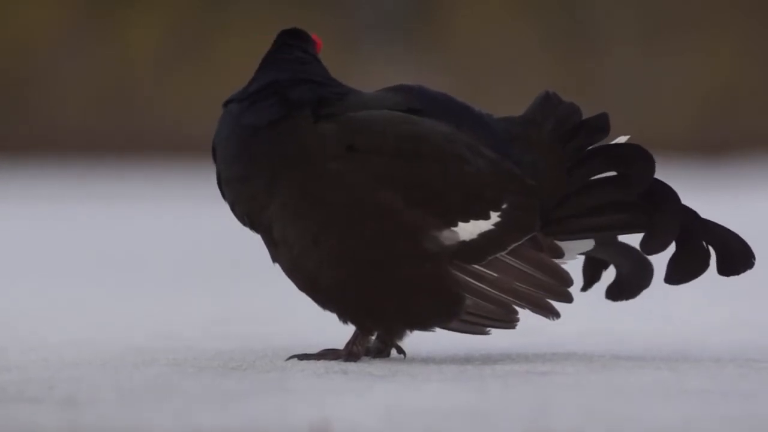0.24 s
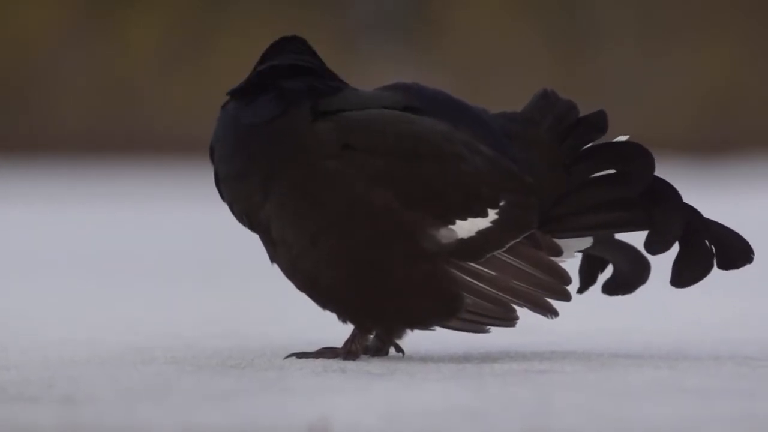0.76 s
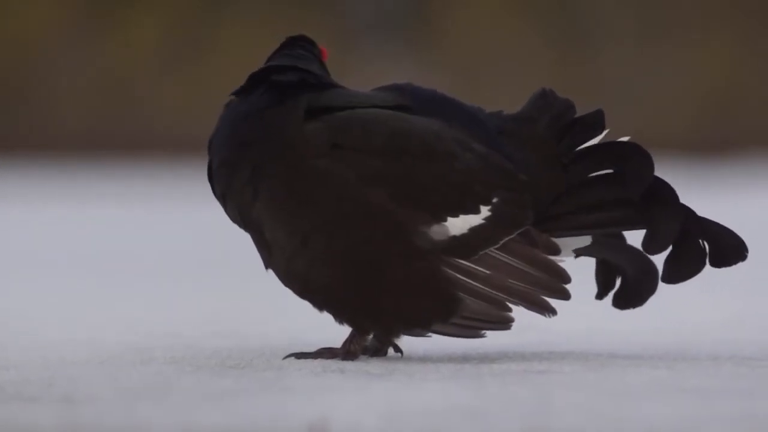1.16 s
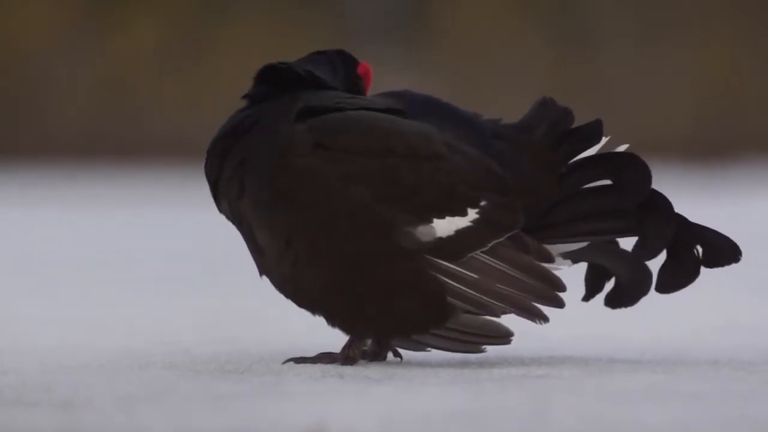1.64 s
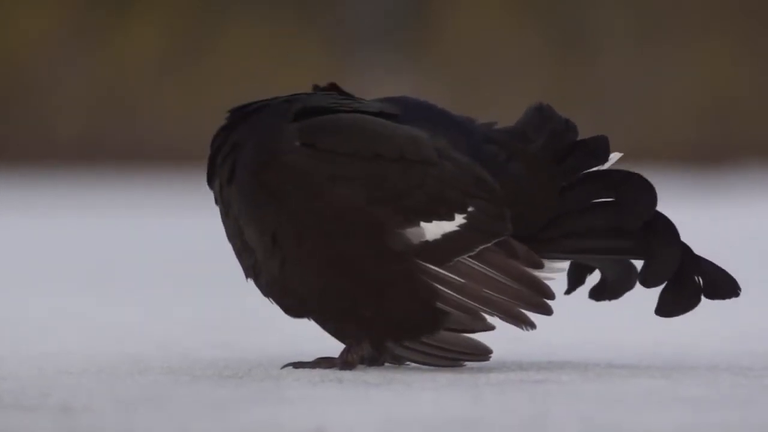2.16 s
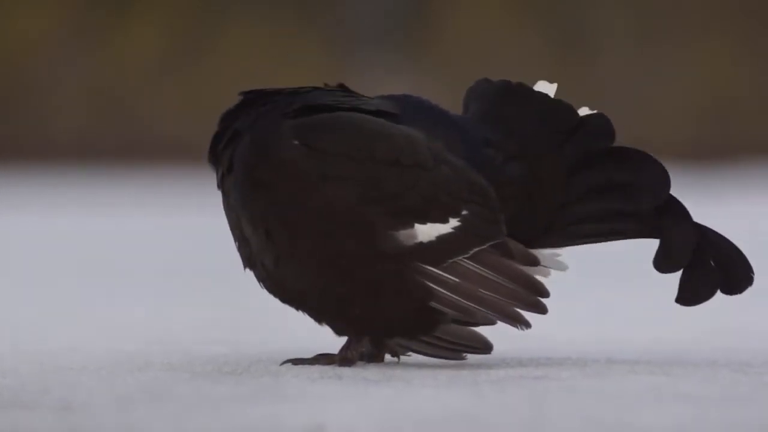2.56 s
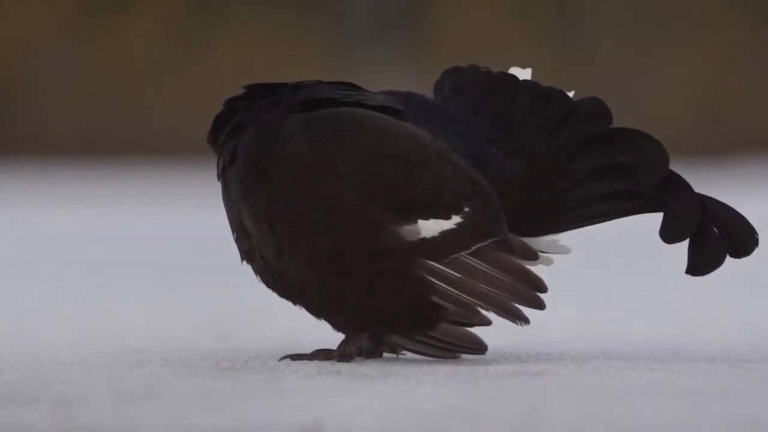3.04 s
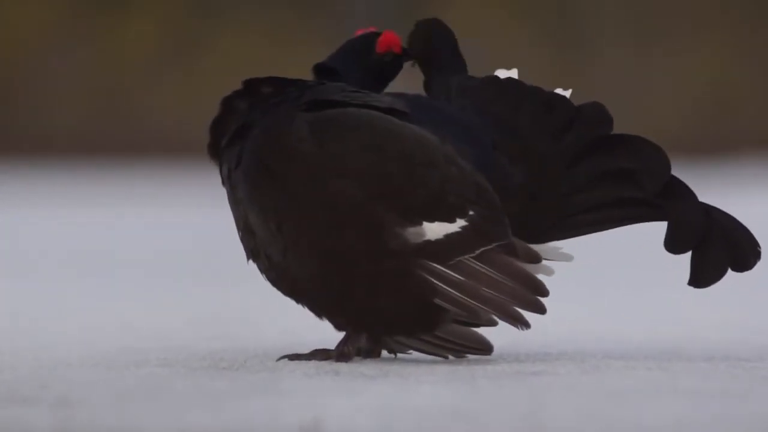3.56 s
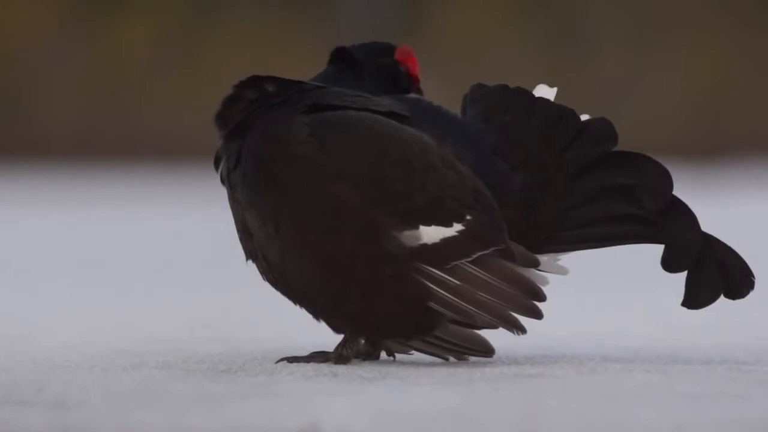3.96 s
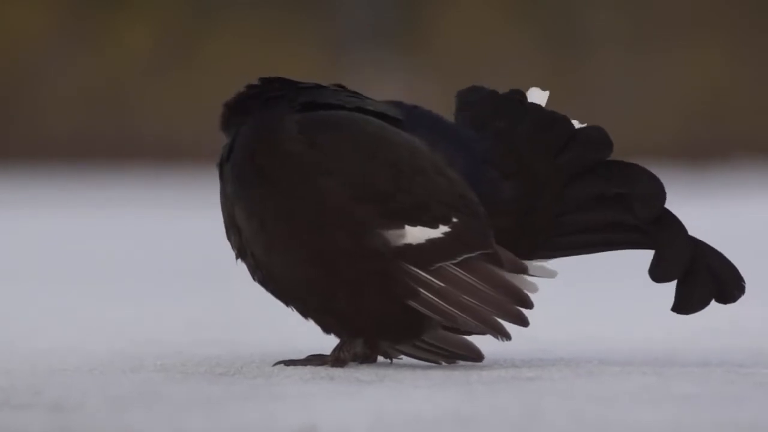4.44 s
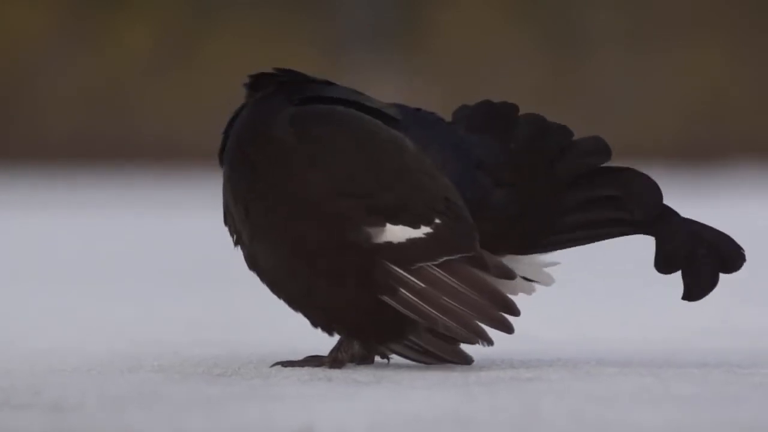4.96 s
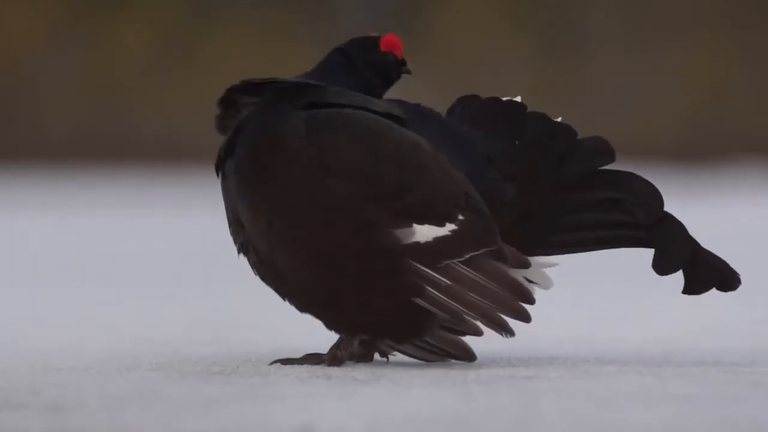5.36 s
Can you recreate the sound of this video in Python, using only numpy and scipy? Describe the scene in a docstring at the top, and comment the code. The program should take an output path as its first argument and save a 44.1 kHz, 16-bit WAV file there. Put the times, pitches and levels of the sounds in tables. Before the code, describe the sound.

Outdoors on frozen ground, a stereo microphone picks up low hollow grouse coos, mostly left. Rippling phrases give way to an even roll, four fuller coos, a short pause and another ripple, then sparse weak bubbling. Two rough hisses, distant blurred cooing, thin chirps and slight wind puffs accompany them over quiet hiss.

```python
"""Black grouse cocks display on open frozen ground, left of a stereo microphone: overlapping singings of one
bubbling song, made of gliding sines through an air-sac band, over a faint blur of distant cocks.
Two sneezing hisses are noise through a moving throat resonance; a small bird far off to the right chirps in
gliding sines; shaped noise makes two puffs of wind and a hiss of air and electronics that slowly sinks."""
import sys
import numpy as np
from scipy import signal
from scipy.fft import rfft, irfft, next_fast_len
from scipy.io import wavfile
from scipy.ndimage import map_coordinates

SR = 44100
rng = np.random.default_rng(int(sys.argv[2]) if len(sys.argv) > 2 else 0)


def log_audio(samples):
    """Write samples as a 16-bit WAV file to the path given in sys.argv[1]."""
    # one column per channel
    frames = np.atleast_2d(samples).T
    # limit to full scale, then quantise
    limited = np.clip(frames, -1, 1)
    pcm = np.round(limited * 32767).astype(np.int16)
    wavfile.write(sys.argv[1], SR, pcm)


N = 247401  # length in samples


def amp(db):
    """Gain of a level in dB."""
    return 10 ** (np.asarray(db) / 20)


def unit(x):
    """x at rms 1."""
    return x / np.sqrt(np.mean(x ** 2) + 1e-20)


def along(points, hz):
    """Values at hz, read from (Hz, value) points on a log frequency axis."""
    point_hz, value = np.transpose(points)
    return np.interp(np.log(hz + 1), np.log(point_hz + 1), value)


def wobble(rate):
    """A smooth random curve, rate knots a second."""
    knots = rng.standard_normal(int(N * rate / SR) + 4)
    return map_coordinates(knots, [np.arange(N) * rate / SR])


def filtered(x, response):
    """x times a complex response of frequency."""
    size = next_fast_len(N + SR // 2)
    spectrum = rfft(x, size) * response(np.fft.rfftfreq(size, 1 / SR))
    return irfft(spectrum, size)[..., :N]


def placed(x, left_db, lag_s):
    """A source left_db louder and lag_s later in the left channel, shared evenly between both."""
    side = np.array([[.5], [-.5]])
    return filtered(x, lambda hz: amp(left_db * side) * np.exp(-2j * np.pi * hz * lag_s * side))


def notes(rows, edge_s, fullness):
    """Gliding sines: the pitch is a parabola through three points, the swell a skewed arch with soft edges."""
    out = np.zeros(N + 2 * SR)  # a spare second at each end for notes that cross it
    start_turns = rng.random(len(rows))
    for (start_s, length_s, start_hz, mid_hz, end_hz, peak_db, peak_place), turn in zip(rows, start_turns):
        u = np.linspace(0, 1, max(round(length_s * SR), 8))
        hz = start_hz * (1 - u) * (1 - 2 * u) + 4 * mid_hz * u * (1 - u) + end_hz * u * (2 * u - 1)
        # warping time moves the top of the arch to peak_place
        skew = np.log(.5) / np.log(np.clip(peak_place, .05, .95))
        arch = np.abs(np.sin(np.pi * u ** skew)) ** fullness
        edge = np.sin(np.pi / 2 * np.clip(np.minimum(u, 1 - u) * length_s / edge_s, 0, 1)) ** 2
        tone = np.sin(2 * np.pi * (np.cumsum(hz) / SR + turn))
        out[SR + round(start_s * SR):][:len(u)] += amp(peak_db) * arch * edge * tone
    return out[SR:SR + N]


def echo(x, t60):
    """The scattered answer of the ground and the far trees: decaying noise, different in each channel."""
    t = np.arange(SR // 2) / SR
    tail = rng.standard_normal((2, len(t))) * amp(-60 * t / t60)
    tail *= 1 - np.exp(-t / 0.0084)  # the scatter builds up before it decays
    return signal.fftconvolve(x[None], tail / np.linalg.norm(tail[0]), axes=1)[:, :N]


def rolls():
    """Even bubbles, each sliding down; pitch and level move steadily through a roll."""
    # rolls, one a row: first_bubble_s, last_bubble_s, first_hz, last_hz (middle pitch), first_peak_db, last_peak_db
    roll_rows = [(1.625, 2.544, 389, 472, -44.5, -37), (4.491, 4.779, 356, 406, -51.5, -44),
                 (5.093, 5.239, 380, 360, -48.5, -48), (5.359, 5.428, 350, 342, -58, -60.5)]
    bubble_every_s, bubble_s, onset_hz, end_hz = .0712, .042, 461, 339.3  # spacing is rounded to fit the roll
    # a low bubble lasts longer and peaks earlier
    slack_hz, slack_s_per_hz, peak_hz, peak_per_hz = 429, 0.00038, 359, 0.005
    bubbles = []
    for first_s, last_s, first_hz, last_hz, first_db, last_db in roll_rows:
        for u in np.linspace(0, 1, round((last_s - first_s) / bubble_every_s) + 1):
            start_s = first_s + u * (last_s - first_s)
            hz = first_hz + u * (last_hz - first_hz)
            length_s = bubble_s + slack_s_per_hz * max(slack_hz - hz, 0)
            peak_db = first_db + u * (last_db - first_db)
            peak_place = peak_per_hz * (hz - peak_hz)
            bubbles.append((start_s, length_s, onset_hz, hz, min(end_hz, 0.96 * hz), peak_db, peak_place))
    return bubbles


def sung(part, times):
    """The coos of one part of the song, each time it is sung."""
    rows = []
    for part_start_s, stretch, ratio, gain_db, until_s in times:
        for s, length_s, start_hz, mid_hz, end_hz, peak_db, peak_place in part:
            if s < until_s:
                rows.append((part_start_s + stretch * s, stretch * length_s, ratio * start_hz,
                             ratio * mid_hz, ratio * end_hz, peak_db + gain_db, peak_place))
    return rows


def cocks():
    """The near cocks coo through their swollen air sacs, all from one side; the sac passes one band."""
    # Every cock sings the same song: a roll of even bubbles, a climax of four full coos, a pause, a rippling close.
    # coos, almost pure, before stretch, ratio and gain: start_s (from the start of the part), length_s,
    # start_hz, mid_hz, end_hz, peak_db, peak_place (0-1)
    climax = [(.02, .048, 490, 486, 380, -36, 0.5), (.089, 0.064, 540, 522, 405, -35, 0.76),
              (.158, .062, 600, 544, 400, -37.5, 0.77), (.242, .037, 583, 528, 390, -37.5, 0.7)]
    close = [(0, 0.063, 472, 536, 532, -45.5, 0.26), (.04, 0.052, 526, 509, 414, -37, 0.74),
             (.152, 0.047, 657, 518, 460, -36.5, 0.64), (.225, 0.047, 484, 510, 560, -48, 0.44),
             (.262, 0.035, 415, 439, 483, -41, 0.51), (.268, 0.067, 438, 575, 470, -48.5, 0.26),
             (.307, 0.039, 550, 462, 397, -39.5, 0.56), (.352, .028, 392, 438, 500, -44, .5),
             (.36, 0.059, 445, 555, 480, -51, .45), (.387, 0.029, 513, 456, 407, -38, 0.54),
             (.432, 0.031, 393, 440, 503, -44, 0.36), (.442, .055, 459, 562, 447, -48.5, 0.5),
             (.49, 0.092, 501, 533, 516, -50.5, 0.35), (.563, 0.051, 537, 472, 407, -37, 0.63),
             (.644, 0.038, 484, 531, 447, -51, 0.35), (.69, 0.032, 566, 495, 440, -37, 0.65),
             (.718, 0.027, 432, 473, 510, -34, 0.42), (.742, 0.028, 540, 484, 420, -38, 0.52),
             (.77, 0.022, 526, 476.5, 572, -36.5, .64), (.808, 0.037, 632, 490, 430.5, -40, .6),
             (.832, 0.022, 493, 457, 400, -49, .4), (.88, 0.028, 572, 539.6, 420, -33, 0.36),
             (.952, 0.056, 434, 590, 520, -35, 0.46), (.996, .036, 542, 481, 400, -36.5, 0.49),
             (1.036, .022, 400, 446, 520, -38.5, 0.47), (1.051, 0.049, 524, 530, 407, -42.5, .65),
             (1.094, 0.02, 476, 523, 588, -45, 0.54), (1.105, 0.064, 701, 520, 422, -37, 0.75),
             (1.338, .031, 535, 520.5, 287, -37, .43)]
    # when a part is sung: start_s, stretch in time, pitch ratio, gain_db, until_s (part broken off, before stretch)
    climax_times = [(-.252, 1.001, 0.98, 1.8, .3), (2.599, 1.001, 1.001, 0.3, .3)]
    close_times = [(.066, 1.005, 1.04, -3.5, 1.2), (.228, 1.01, 1, 0.97, 1.5),
                   (3.096, 1.0001, 1.001, 0.6, 1.5)]
    # single coos of further cocks: start_s, length_s, start_hz, mid_hz, end_hz, peak_db, peak_place (0-1)
    strays = [(1.394, .065, 429, 583.5, 300, -41.5, 0.6), (1.449, 0.068, 413, 594, 300, -47, 0.47),
              (1.517, 0.057, 567, 516, 298, -49, .41), (1.578, 0.063, 557, 480, 372, -46.5, 0.46),
              (1.775, 0.031, 520, 470, 400, -46.5, .3), (1.845, 0.02, 499, 466, 400, -46, .4),
              (1.98, 0.031, 546, 481, 423, -45.5, 0.7), (2.229, 0.034, 566, 493, 378, -41, 0.68),
              (3.498, 0.038, 519.8, 584, 540.5, -47.5, 0.77), (3.674, .06, 561.1, 588, 440, -53, 0.52),
              (5.032, 0.052, 508, 387, 375, -42.5, 0.045), (5.522, 0.068, 444, 394, 447, -50.5, .3),
              (5.588, .021, 503, 426, 380, -42, .06)]
    # faint short high notes among the coos, each falling a little: start_s, length_s, mid_hz, peak_db
    high_rows = [(3.49, 0.072, 1085, -65.5), (3.689, 0.059, 1100, -61.5), (3.741, 0.067, 1095, -63),
                 (3.799, .04, 1070, -60), (3.865, 0.035, 1511, -58.5), (4.499, 0.063, 702, -63.5)]

    def sac(hz):
        return 1 / (1 + 1j * (hz / 470 - 470 / (hz + 1)) ** 3 * 2.5)  # one band around 470 Hz

    bubbling = notes(rolls() + sung(close, close_times) + strays, edge_s=0.0074, fullness=0.98)
    full_coos = notes(sung(climax, climax_times), edge_s=0.0063, fullness=0.43)
    voice = filtered(bubbling + full_coos, sac)
    near, wide = echo(voice, t60=0.095)
    falling = [(s, length_s, 1.015 * hz, hz, 0.924 * hz, db, .5) for s, length_s, hz, db in high_rows]
    high = notes(falling, edge_s=0.0033, fullness=0.59)
    direct = placed(voice + high + amp(-13.5) * near, left_db=6.0, lag_s=7e-5)
    return direct + amp(-25.5) * placed(wide, left_db=-10.0, lag_s=0)


def far_cocks():
    """Distant cocks blur into a faint bubbling: many short falling coos at random moments."""
    far_level = [(0, -59.5), (2.3, -60.5), (2.85, -68.5), (3.6, -57.5), (4.25, -69)]  # lowest peak level of the distant coos: time_s, level_db
    when, pitch, size = rng.random((200, 3)).T
    start_s = when * N / SR
    hz = 350 + 190 * pitch
    peak_db = np.interp(start_s, *np.transpose(far_level)) + 6 * size
    length_s, peak_place = np.full(200, 0.0469), np.full(200, .5)
    rows = np.transpose([start_s, length_s, hz + 50, hz, hz - 50, peak_db, peak_place])
    return placed(notes(rows, edge_s=0.0078, fullness=1.0), left_db=1.5, lag_s=0)


def air():
    """Smooth wide noise of air and electronics, drifting and sinking a little; the spaced ports hear it partly alike."""
    air_spectrum = [(15, -64), (60, -24.5), (130, -16), (290, -4), (900, -3), (2100, -7.5), (6000, -14),
                    (14400, -18.5)]  # colour of the hiss: pitch_hz, level_db (per Hz, relative)
    likeness = [(200, 0.57), (620, -0.42), (1350, -0.5), (2930, -0.23), (6370, 0.24)]  # how alike left and right are: pitch_hz, correlation (-1 to 1)

    def colour(hz):
        # the angle sets how much is common to both channels and how much opposed
        angle = np.arccos(np.clip(along(likeness, hz), -1, 1)) / 2
        return amp(along(air_spectrum, hz)) * [np.cos(angle), np.sin(angle)]

    mid, side = filtered(rng.standard_normal((2, N)), colour)
    # starts near -57 dB and sinks 0.13 dB a second
    level_db = -57 + 0.43 * wobble(6.4) - 0.13 * np.arange(N) / SR
    return amp(level_db) * unit(np.array([mid + side, mid - side]))


def small_bird():
    """Thin chirps of one shape, a dip, a shelf, a last rise, and a short falling note: gliding sines."""
    # far chirps: start_s, length_s, shelf_hz, top_hz (of the last rise), level_db (before the shape's own)
    chirps = [(0.468, 0.052, 4710, 5370, -62.5), (0.769, 0.056, 4480, 5350, -62),
              (1.072, 0.05, 4220, 5000, -63), (2.414, .054, 4900, 6180, -67.5),
              (2.559, .047, 4430, 5400, -67), (2.671, 0.051, 4530, 5880, -62)]
    # shape of one chirp: share of the length, pitch step (dip -1, shelf 0, top 1), level_db (relative)
    chirp_shape = [(0, .6, -8), (.22, -1.1, -7.5), (.5, -0.073, -6), (.72, -.05, -1), (1.001, 1, -1)]
    # short falling note: start_s, length_s, start_hz, mid_hz, end_hz, peak_db, peak_place (0-1)
    cheeps = [(2.828, .02, 4800, 4300, 3850, -66, .6)]
    out = np.zeros(N)
    share, rise, shape_db = np.transpose(chirp_shape)
    for start_s, length_s, shelf_hz, top_hz, db in chirps:
        u = np.linspace(0, 1, round(length_s * SR))
        step = np.interp(u, share, rise)
        hz = shelf_hz + step * np.where(step > 0, top_hz - shelf_hz, 800)  # a dip step is 800 Hz
        tone = np.sin(2 * np.pi * np.cumsum(hz) / SR)
        out[round(start_s * SR):][:len(u)] = amp(db + np.interp(u, share, shape_db)) * tone
    out = out + notes(cheeps, edge_s=.004, fullness=0.67)
    return placed(out, left_db=-17.0, lag_s=0) + echo(out, t60=0.13)


def hisses():
    """Turbulent air rings a narrow throat resonance that sinks and rises, inside a broad weak one; the flow flutters."""
    # air through the open bill, one list a hiss: time_s, resonance_hz (throat), flow_db (before flutter and ring level)
    hiss_curves = [
        [(1.02, 1750, -66), (1.06, 1525, -57), (1.13, 1325, -57.5), (1.21, 1227, -62), (1.26, 1200, -70.5),
         (1.31, 1234, -60), (1.39, 1272, -65), (1.43, 1347, -53), (1.49, 1379, -63), (1.54, 1423, -58),
         (1.62, 1516, -61.5), (1.78, 1656, -70)],
        [(4.24, 1600, -66.5), (4.27, 1450, -58.5), (4.34, 1317, -52), (4.43, 1198, -71), (4.52, 1132, -69),
         (4.63, 1375, -65), (4.72, 1493, -65.5), (4.78, 1710, -74)],
    ]
    t, out = np.arange(N) / SR, np.zeros(N)
    for rows in hiss_curves:
        time_s, throat_hz, flow_db = np.transpose(rows)
        turns = np.cumsum(np.interp(t, time_s, throat_hz)) / SR
        flow = amp(np.interp(t, time_s, flow_db, -120, -120) + 2.75 * wobble(29.97))
        # the narrow ring gives way to the broad one as the bill opens
        sharp_db = np.interp(t, time_s[[0, -1]], [0, -11])
        broad_db = -13.5 - 0.65 * sharp_db
        for ratio, width_hz, ring_db in ((1, 135, sharp_db), (1.13, 410, broad_db)):
            noise = rng.standard_normal(N) + 1j * rng.standard_normal(N)
            pole = [1, -np.exp(-np.pi * width_hz / SR)]  # used twice for steeper skirts
            band = signal.lfilter([1], np.convolve(pole, pole), noise)
            # the low band of noise is shifted up to the moving resonance
            ring = unit((band * np.exp(2j * np.pi * ratio * turns)).real)
            out += flow * amp(ring_db) * ring
    return placed(out, left_db=18.0, lag_s=0) + amp(-10.5) * echo(out, t60=0.72)


def puffs():
    """Wind strikes each microphone port with its own low noise, in lumps that both ports share."""
    puff_rows = [(3.981, 0.13, -56.5), (4.44, 0.054, -63.5)]  # wind on the microphone: start_s, length_s, level_db (before the lumps)
    puff_spectrum = [(30, -23), (80, -9.5), (200, -2), (320, -38)]  # colour of the wind: pitch_hz, level_db (per Hz, relative)
    t = np.arange(N) / SR
    swell = np.zeros(N)
    for start_s, length_s, db in puff_rows:
        swell += amp(db) * np.abs(np.sin(np.pi * np.clip((t - start_s) / length_s, 0, 1))) ** .5
    lumps = amp(2.295 * wobble(60))
    wind = filtered(rng.standard_normal((2, N)), lambda hz: amp(along(puff_spectrum, hz)))
    return swell * lumps * unit(wind)


def scene():
    """All sources at the two ports."""
    return cocks() + far_cocks() + air() + small_bird() + hisses() + puffs()


def record(dry):
    """A sharp band limit: nothing passes from top_hz up."""
    top_hz = 14440
    return filtered(dry, lambda hz: hz < top_hz)


dry = scene()
out = record(dry)
log_audio(out)
```